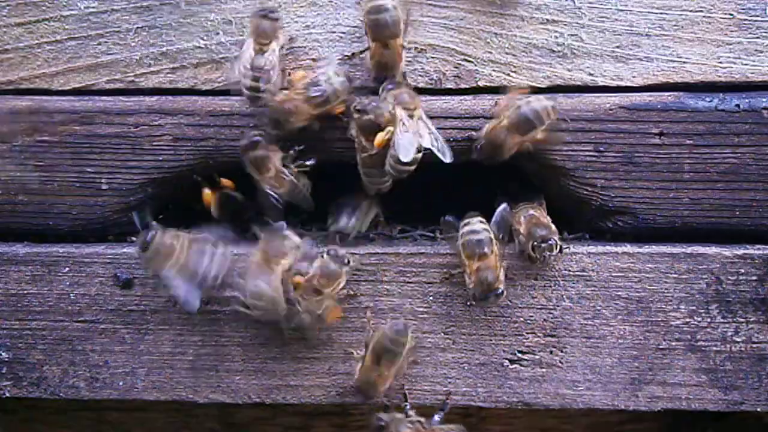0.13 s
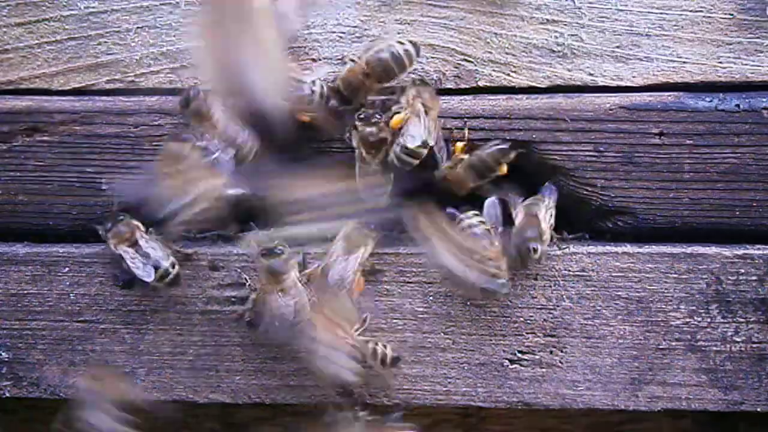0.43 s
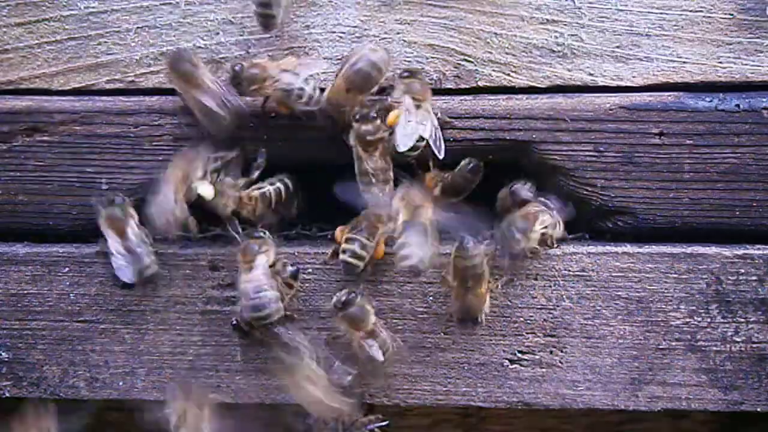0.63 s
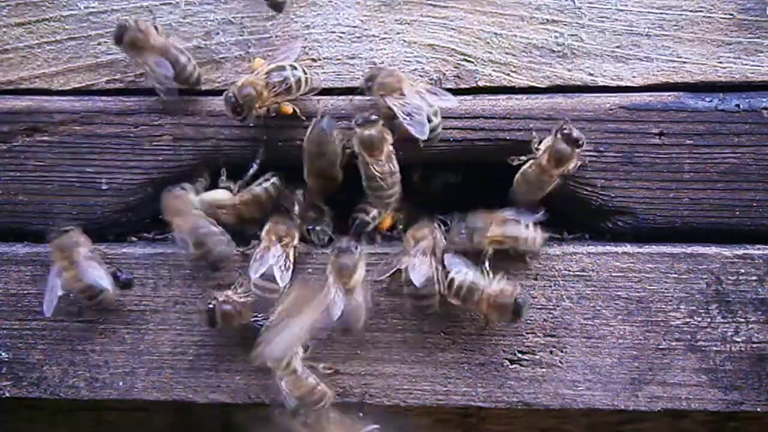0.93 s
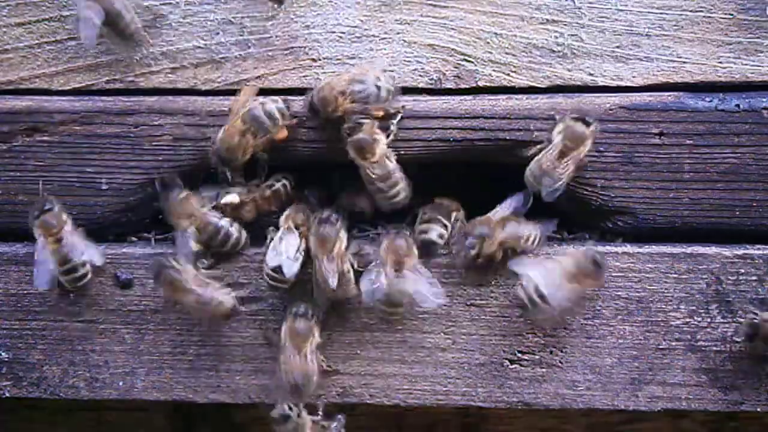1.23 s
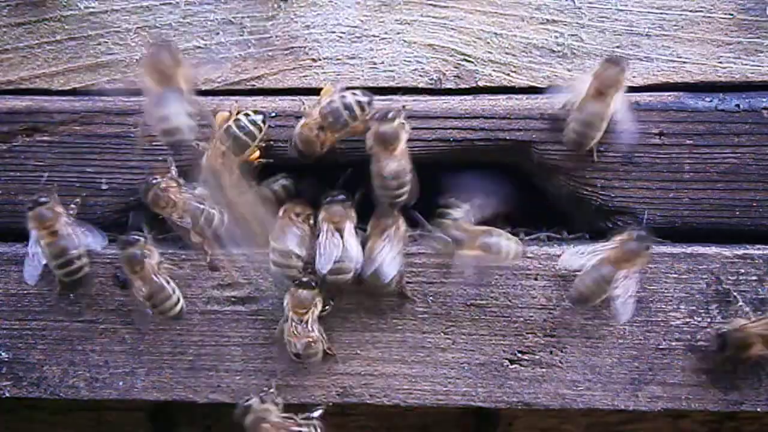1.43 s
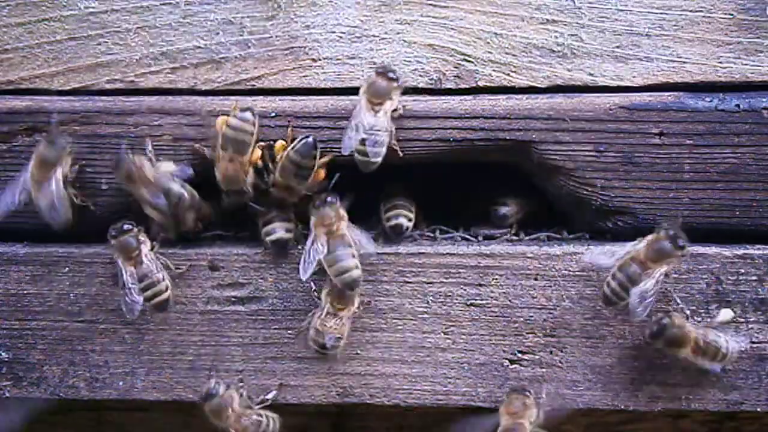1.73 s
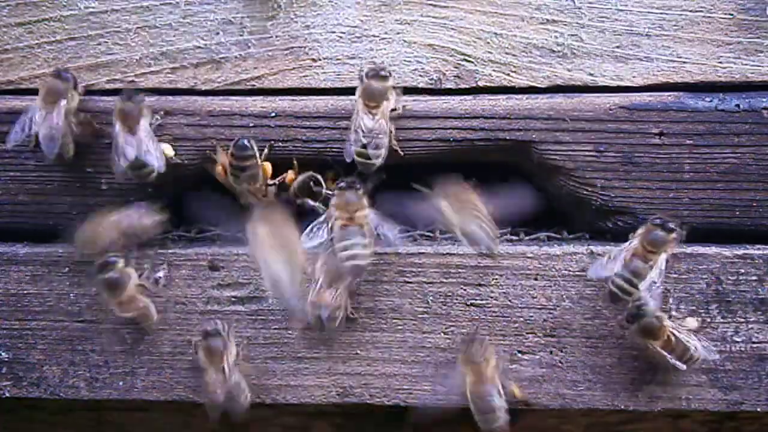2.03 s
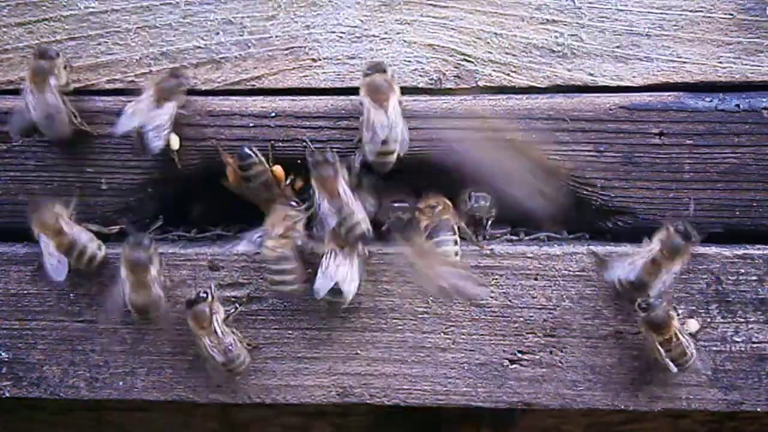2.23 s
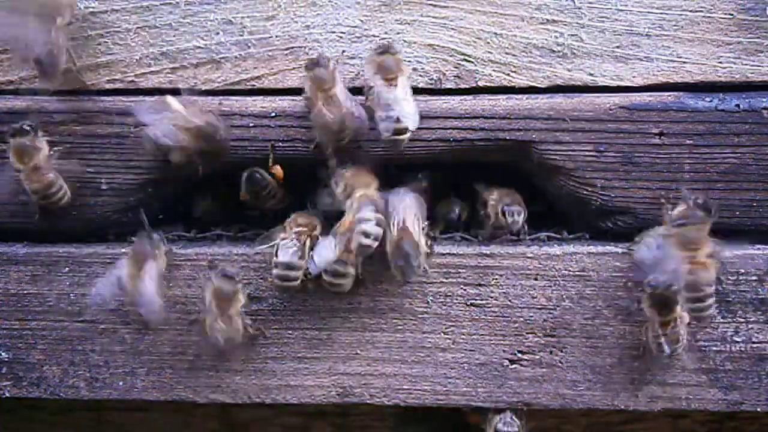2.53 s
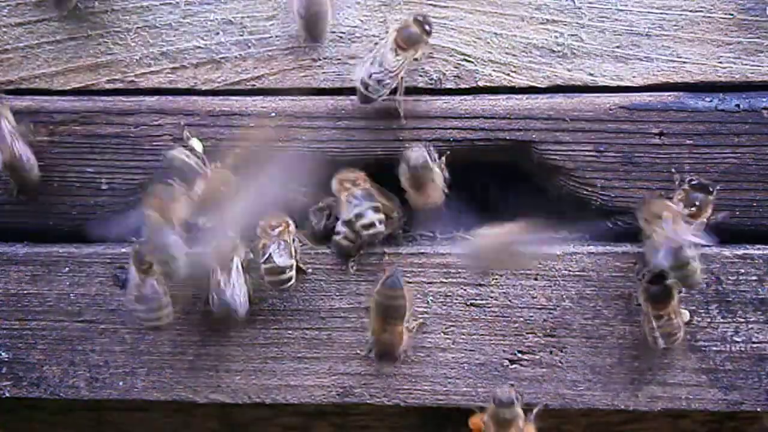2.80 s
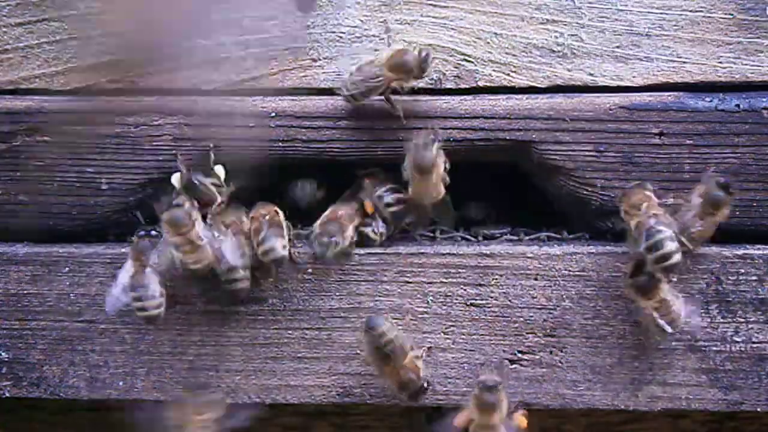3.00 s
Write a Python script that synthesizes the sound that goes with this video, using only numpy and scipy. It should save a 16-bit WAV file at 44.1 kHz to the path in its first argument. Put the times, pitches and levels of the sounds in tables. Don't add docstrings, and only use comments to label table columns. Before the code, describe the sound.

Honey bees buzz in a dense, continuous swarm hum after a brief loud burst of static

```python
import sys
import numpy as np
from scipy import signal
from scipy.fft import rfft, irfft
from scipy.io import wavfile
from scipy.ndimage import map_coordinates

SR = 44100
rng = np.random.default_rng(int(sys.argv[2]) if len(sys.argv) > 2 else 0)


def gain_from_db(level_db):
    decades = np.asarray(level_db, float) / 20
    return 10 ** decades


def transcribe(signal):
    frames = np.atleast_2d(signal).T
    limited = np.clip(frames, -1, 1)
    pcm = np.round(limited * 32767).astype(np.int16)
    wavfile.write(sys.argv[1], SR, pcm)


N = 139356

# frequency in Hz, level in dB.
PUFF_COLOUR = [(300, -3), (700, -6), (1250, -1), (1700, -6.5), (2400, -9), (3000, -13), (3600, -1),
               (4200, -3)]


def level(x, db):
    return x * gain_from_db(db) / np.sqrt(np.mean(x ** 2))


def curve(table):
    seconds, db = np.array(table).T
    return gain_from_db(np.interp(np.arange(N) / SR, seconds, db))


def coloured(x, shape):
    hz, db = np.array(shape).T
    bins_hz = np.arange(len(x) // 2 + 1) * SR / len(x)
    gain_db = np.interp(np.log(bins_hz + 1), np.log(hz), db)
    return irfft(rfft(x) * gain_from_db(gain_db), len(x))


def walk(rate):
    knots = rng.standard_normal(1600)
    return map_coordinates(knots, [np.arange(N) * min(rate, 400) / SR + 2], order=3)


def bump(start, length, width):
    t = np.arange(N) / SR
    return np.exp(-((t - start - length / 2) / (width * length)) ** 4)


def draught():
    # time in seconds, level in dB.
    strength = [(0.14, -65), (0.26, -54), (0.35, -49), (0.5, -47), (0.66, -42.5), (0.82, -46), (1.03, -49),
                (1.59, -47.5), (1.86, -65), (2.4, -66.5), (2.83, -76), (3.16, -61.5)]
    # frequency in Hz, level in dB.
    rumble_colour = [(15, -21.5), (45, -1), (100, -6), (160, -17), (400, -9), (1000, -40.5)]
    gusts = gain_from_db(-4 * walk(16))
    rumble = coloured(rng.standard_normal(N), rumble_colour)
    return curve(strength) * gusts * level(rumble, 0.5)


def thumps():
    # start in seconds, length in seconds, level in dB, top frequency in Hz.
    pushes = [(.555, .025, -33, 150), (.585, 0.031, -30.5, 160), (.63, 0.027, -36, 120),
              (.70, 0.017, -37.5, 120), (.778, 0.018, -32, 110), (1.0, .03, -41.5, 120),
              (1.08, 0.034, -62, 70), (1.17, 0.024, -58, 60), (1.555, 0.043, -34, 130),
              (1.71, .04, -51, 60), (2.2, 0.072, -45.5, 110)]
    out = 0
    for start, length, db, hz in pushes:
        low_band = [(20, -8), (50, 0), (hz, 0), (4 * hz, -22), (4000, -70)]
        push = coloured(rng.standard_normal(N), low_band) * bump(start, length, 0.44)
        out = out + level(push, db) * np.sqrt(length * SR / N)
    return out


def brushes():
    # start in seconds, length in seconds, level in dB.
    touches = [
        (0.509, 0.062, -35),
        (0.574, 0.012, -37),
        (1.03, .04, -34.5),
        (1.49, 0.074, -34.5),
        (1.598, .055, -31),
        (1.915, .015, -33.5),
        (1.97, 0.066, -54),
        (2.931, 0.028, -44),
        (3.04, 0.084, -35.5),
    ]
    # frequency in Hz, level in dB.
    rasp_colour = [(600, -28), (1500, -10), (2600, -5), (3600, -1), (4400, -8)]
    stroke_hz = 240 * (1 + 0.12 * walk(60))
    phase = np.cumsum(stroke_hz) / SR % 1
    scrape = np.exp(-phase / 0.2) * rng.standard_normal(N)
    touch = sum(gain_from_db(db) * bump(start, length, 0.55) for start, length, db in touches)
    return touch * level(coloured(scrape, rasp_colour), 0)


def wings(hz, jitter, spread_db, tilt):
    # multiple of the beat, level in dB.
    overtones = [(1, -3.5), (2, -1.5), (3, -8.5), (4, -11), (5, -4.5), (6, -10.5), (7, -11.5), (8, -16.5),
                 (10, -15), (15, -12.5)]
    phase = (np.cumsum(hz * (1 + jitter * walk(120))) / SR + rng.random()) % 1
    k, turn = np.arange(1, 17), np.linspace(0, 1, 513)
    size_db = np.interp(k, *np.array(overtones).T) + np.interp(k, *np.array(tilt).T)
    size = gain_from_db(size_db + spread_db * rng.standard_normal(16))
    shift = 0.1236 * k[:, None] * rng.standard_normal((16, 1))
    cycle = size @ np.cos(2 * np.pi * (k[:, None] * turn + shift))
    hum = np.interp(phase, turn, -level(cycle, 0))
    puffs = np.exp(-phase / 0.29) * rng.standard_normal(N)
    return hum, puffs


def swarm():
    # time in seconds, level in dB.
    activity = [(0.14, -40.5), (0.26, -35), (0.51, -31.5), (0.52, -29.5), (0.65, -35.5), (0.69, -33),
                (1.38, -35.5), (1.75, -34), (1.76, -34.5), (1.87, -34), (2.17, -35), (2.24, -34.5),
                (2.61, -35.5), (2.63, -37), (2.86, -36), (2.95, -35.5), (3.16, -33.5)]
    tone, air = 0, 0
    for hz in np.linspace(205.1, 280, 18):
        near = gain_from_db(3.5 * walk(5.9))
        drifting_hz = hz * (1 + 0.022 * walk(5))
        hum, puffs = wings(drifting_hz, 0.01001, spread_db=2.0, tilt=[(1, 0)])
        tone = tone + near * hum
        air = air + near * puffs
    return curve(activity) * (level(tone, -1) + level(coloured(air, PUFF_COLOUR), 3))


def close_passes():
    # start in seconds, length in seconds, first beat in Hz, last beat in Hz, level in dB.
    close_bees = [(0.328, 0.12, 230, 239, -42.5), (0.398, .22, 244, 260.7, -37.5),
                  (0.462, 0.098, 284, 294.8, -37.5), (0.559, 0.089, 232, 217, -43),
                  (0.596, .10, 268, 245.8, -37.5), (0.662, .10, 224, 221.8, -37.5),
                  (0.784, 0.08, 222, 240, -39.5), (0.898, .19, 246, 229.8, -38),
                  (1.274, .09, 240, 234, -43.5), (1.537, 0.074, 255, 255.8, -37),
                  (1.656, .105, 261.6, 273.8, -29), (1.77, 0.065, 256, 244.5, -35),
                  (1.835, 0.066, 268, 266.3, -34.5), (1.858, 0.1, 234, 232.5, -38.5),
                  (2.08, 0.15, 258, 260, -46), (2.211, .13, 236, 239.6, -41), (2.432, 0.094, 238, 232, -36),
                  (2.613, .14, 243, 224.2, -34), (2.786, .09, 242, 223.9, -33),
                  (2.916, 0.068, 272, 262.7, -30), (2.89, .09, 243, 240.6, -38.5),
                  (2.969, 0.093, 292, 280, -32.5), (3.033, .16, 279, 273.2, -34.5),
                  (3.002, 0.054, 238, 240, -29.5),
                  (0.248, 0.1, 200, 190, -50), (0.484, 0.15, 190, 190.8, -46),
                (0.781, .14, 198.2, 190.3, -41), (0.92, .12, 185.3, 179.5, -40.5),
                (1.044, 0.12, 271, 288.7, -43), (1.19, 0.061, 264, 261, -46),
                (1.317, 0.045, 279, 283, -36.5), (1.441, 0.091, 212, 209, -41),
                (1.942, 0.089, 215, 205.2, -44), (2.392, 0.12, 267.9, 271.3, -39.5),
                (2.623, 0.13, 219.4, 201, -39.5), (2.848, .07, 287, 290.6, -38.5),
                (2.845, .18, 197.1, 184.5, -40)]
    # multiple of the beat, change in dB.
    near_tilt = [(1, -1.5), (2, 1), (3, -2.5), (5, -7), (8, -7), (16, -9.5)]
    far_db, edge_s = -40.5, 0.022
    t, tone, air = np.arange(N) / SR, 0, 0
    for start, length, hz0, hz1, db in close_bees:
        to_edge = np.minimum(t - start, start + length - t)
        fade = np.sin(np.pi / 2 * np.clip(to_edge / edge_s + 0.5, 0, 1)) ** 2
        near = gain_from_db(db + 1.4 * walk(29.97)) * fade
        glide_hz = np.interp(t, [start, start + length], [hz0, hz1])
        tilt = np.array(near_tilt) * [1, max(db - far_db, 0) / 10]
        hum, puffs = wings(glide_hz, 0.005, spread_db=1.5, tilt=tilt)
        tone = tone + near * hum
        air = air + near * puffs
    shaped = coloured(air, PUFF_COLOUR)
    return tone + shaped * gain_from_db(-7) * np.std(tone) / np.std(shaped)


def scene():
    return (draught() + thumps() + brushes() + swarm() + close_passes())[None]


def low_pass(x):
    return signal.sosfilt(signal.butter(12, 16820, fs=SR, output="sos"), x)


def record(dry):
    garbage_s, running_s = 0.0726, 0.1226
    offset, clip = -0.0097, 0.74
    slow = signal.resample_poly(np.pad(dry[0], (0, 4410), "reflect"), 80, 441) + offset
    garbage = gain_from_db(-2.5) * rng.uniform(-0.9, 1, len(slow))
    slow = np.where(np.arange(len(slow)) / 8000 < running_s, garbage, slow)
    smooth = signal.firwin(32 * 441 + 1, 1 / 441, window=("kaiser", 9))
    full = signal.resample_poly(slow, 441, 80, window=smooth)
    full = coloured(full, [(4580, 0), (4680, -70)])[:N]
    started = np.clip((np.arange(N) / SR - garbage_s) * 8000 + 1, 0, 1) ** 2
    return low_pass(np.clip(full * started, -clip, clip)[None])


dry = scene()
out = record(dry)
transcribe(out)
```